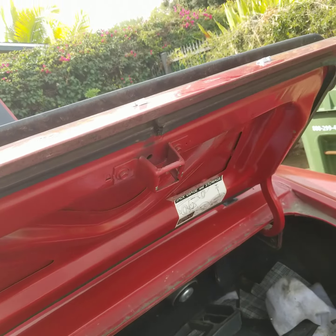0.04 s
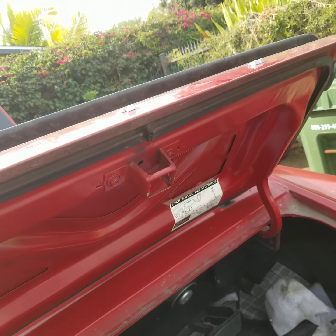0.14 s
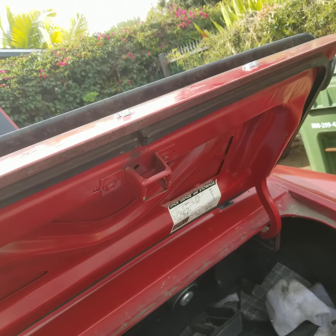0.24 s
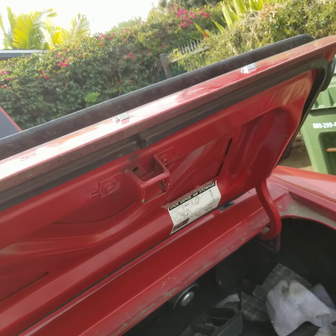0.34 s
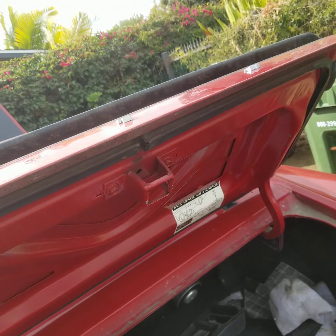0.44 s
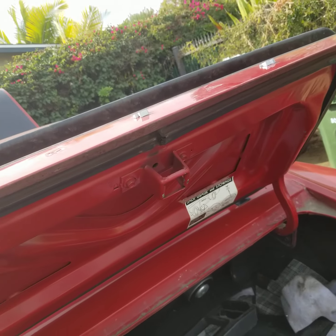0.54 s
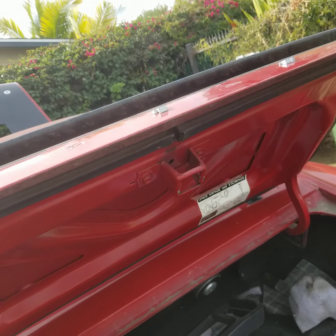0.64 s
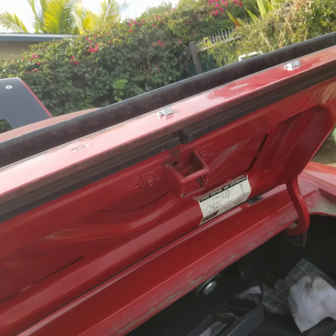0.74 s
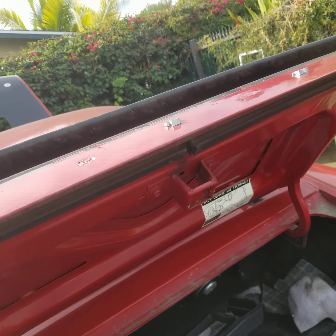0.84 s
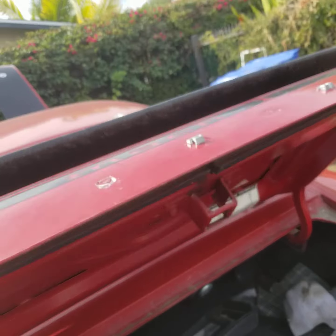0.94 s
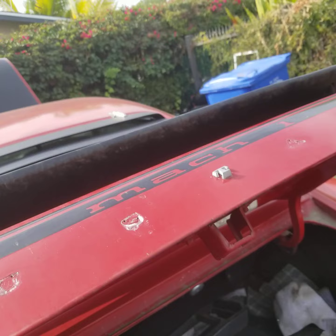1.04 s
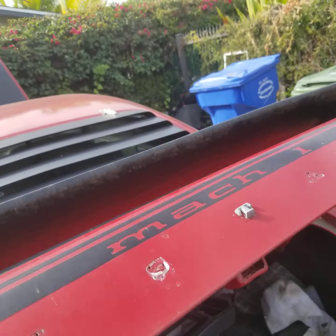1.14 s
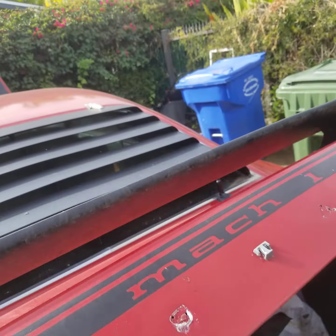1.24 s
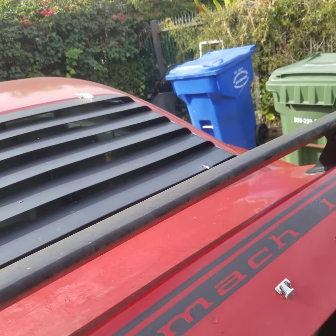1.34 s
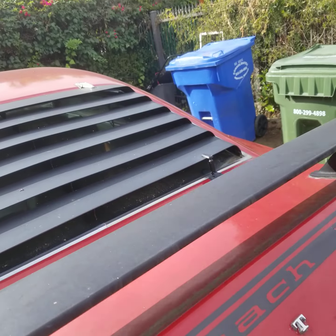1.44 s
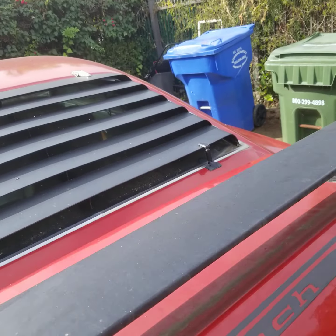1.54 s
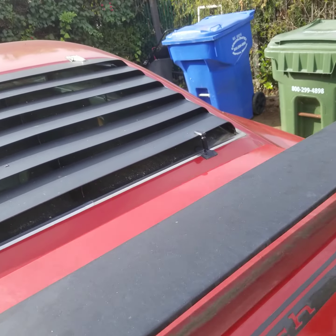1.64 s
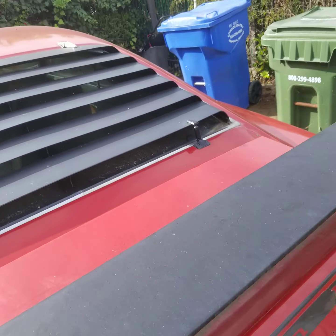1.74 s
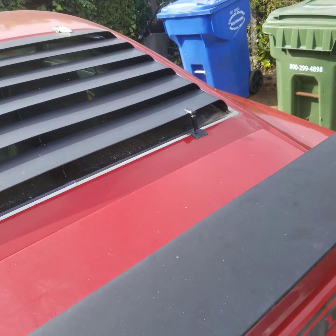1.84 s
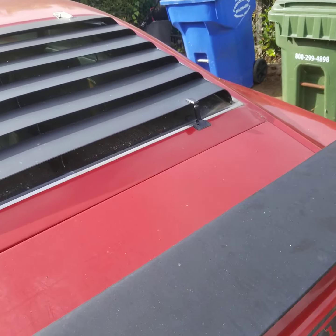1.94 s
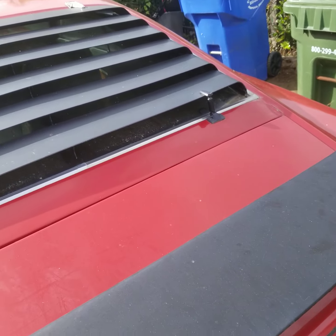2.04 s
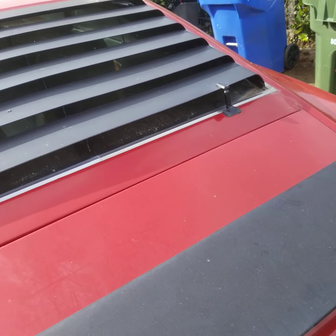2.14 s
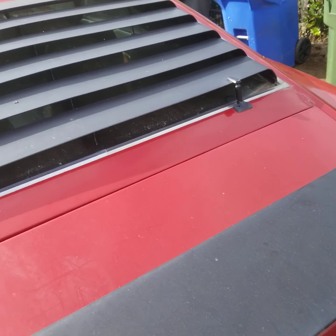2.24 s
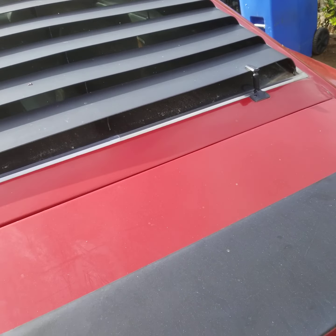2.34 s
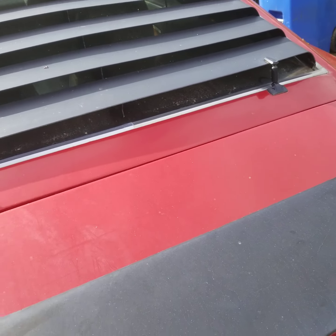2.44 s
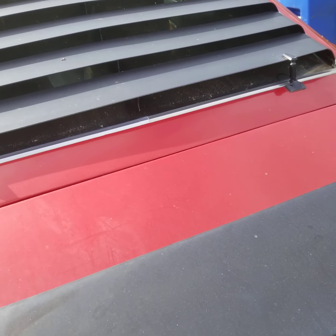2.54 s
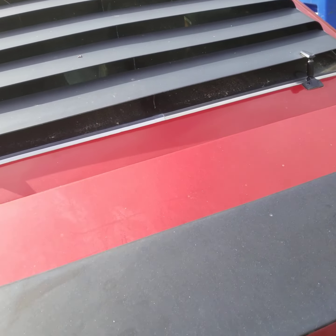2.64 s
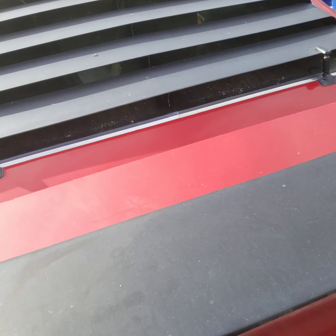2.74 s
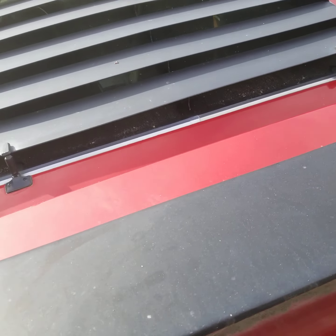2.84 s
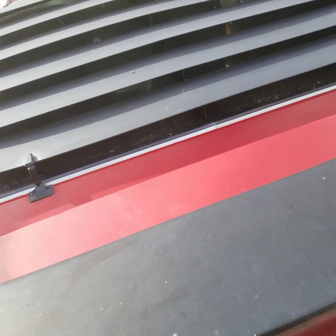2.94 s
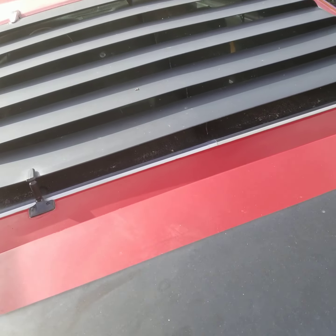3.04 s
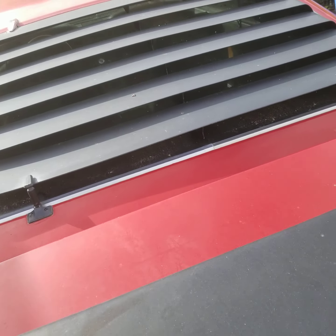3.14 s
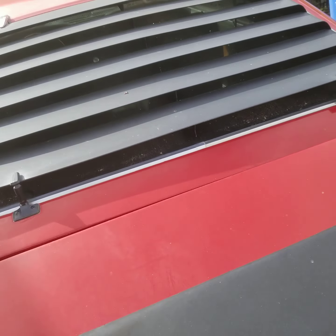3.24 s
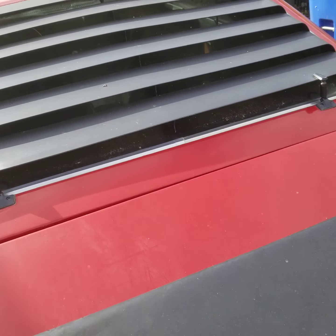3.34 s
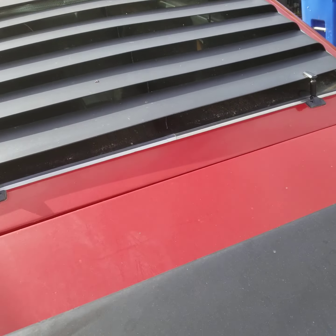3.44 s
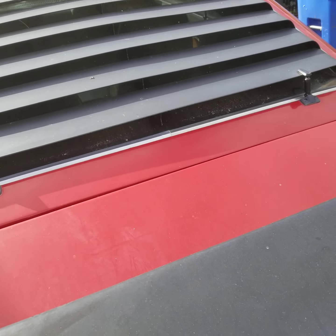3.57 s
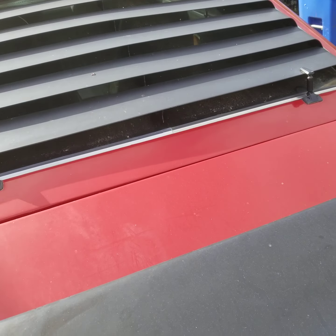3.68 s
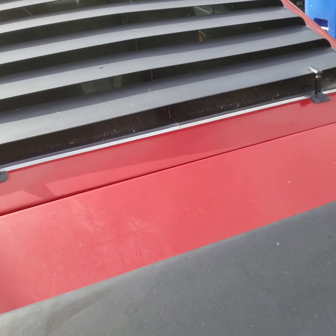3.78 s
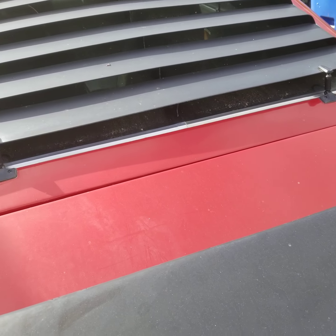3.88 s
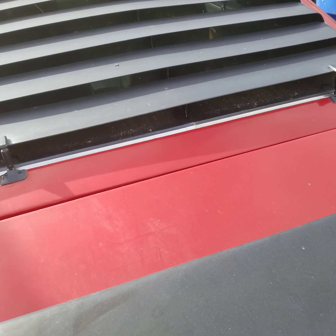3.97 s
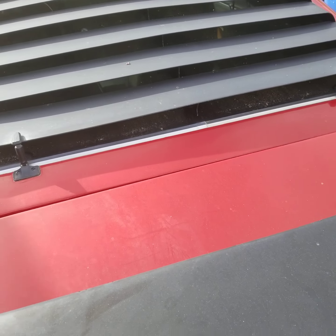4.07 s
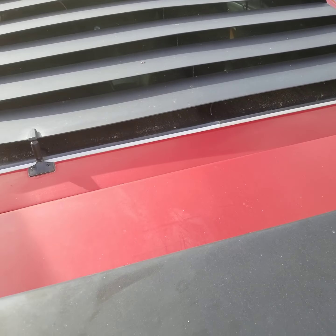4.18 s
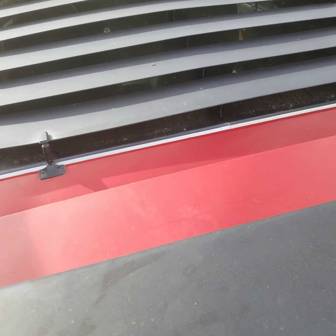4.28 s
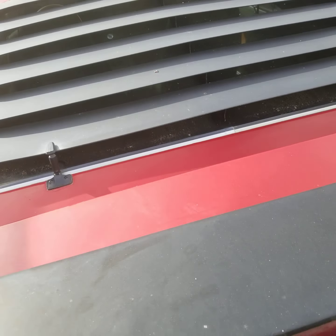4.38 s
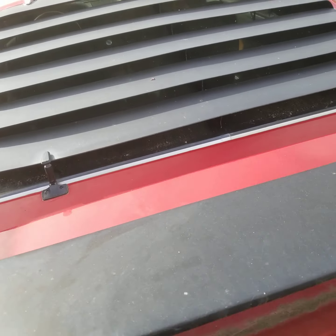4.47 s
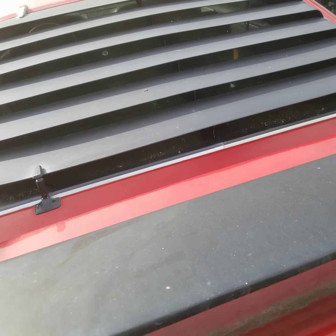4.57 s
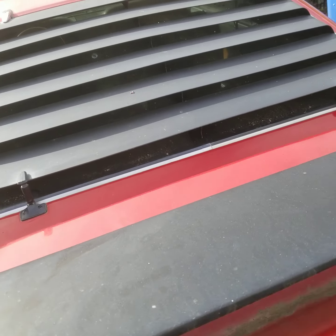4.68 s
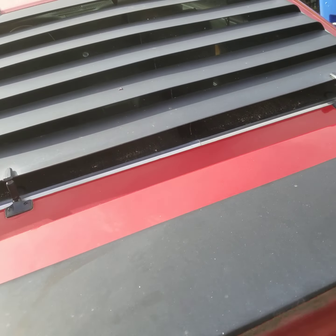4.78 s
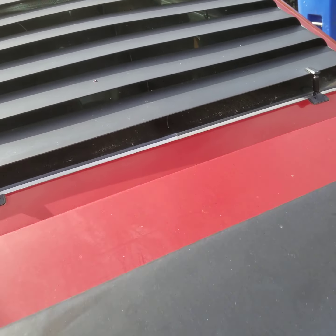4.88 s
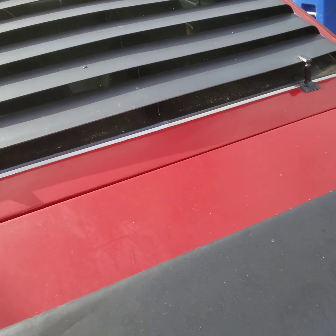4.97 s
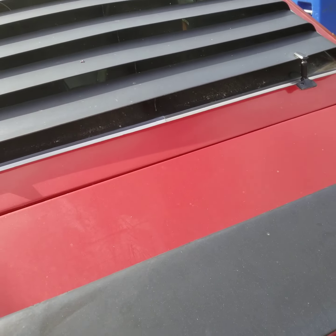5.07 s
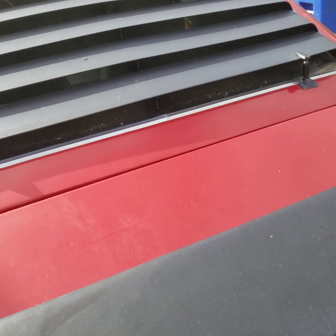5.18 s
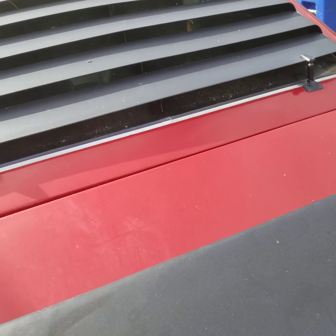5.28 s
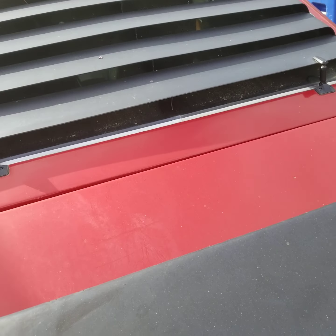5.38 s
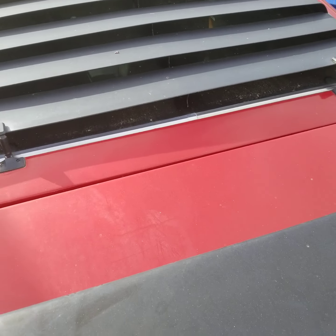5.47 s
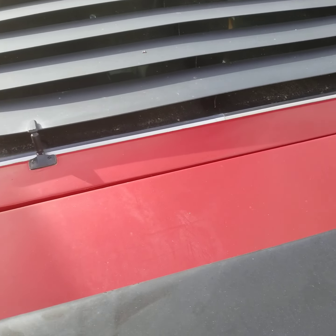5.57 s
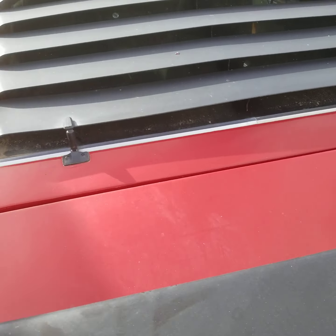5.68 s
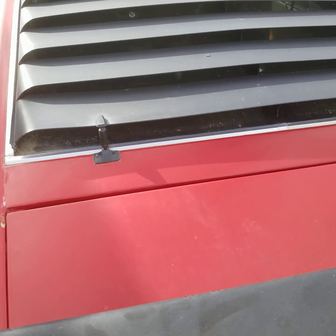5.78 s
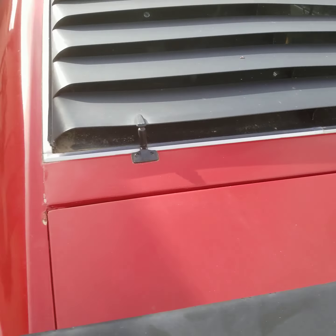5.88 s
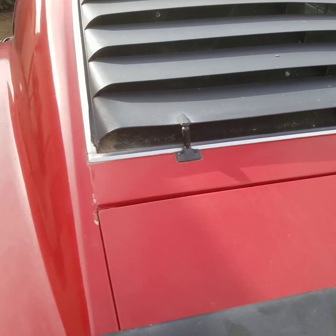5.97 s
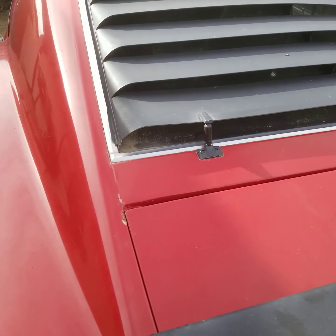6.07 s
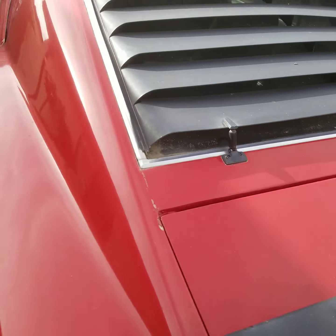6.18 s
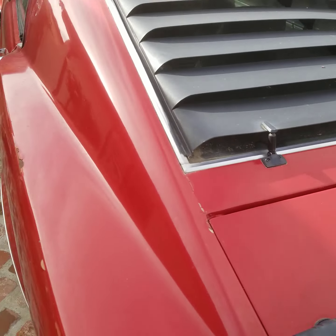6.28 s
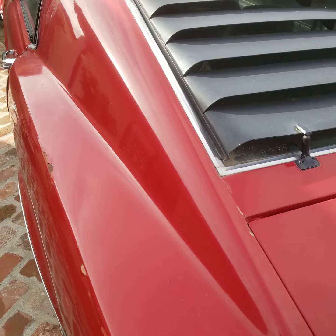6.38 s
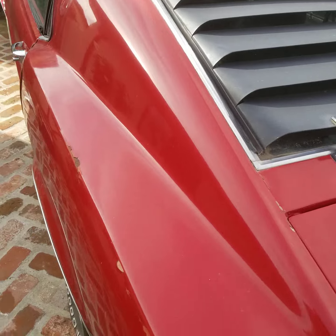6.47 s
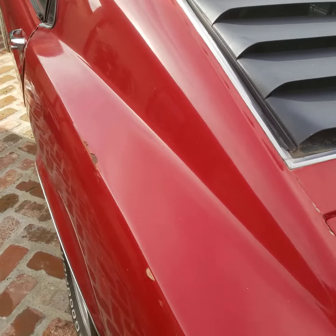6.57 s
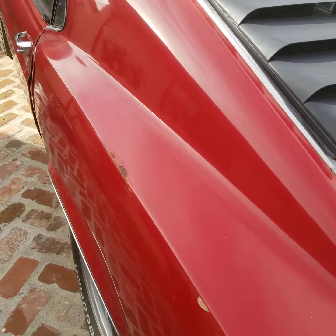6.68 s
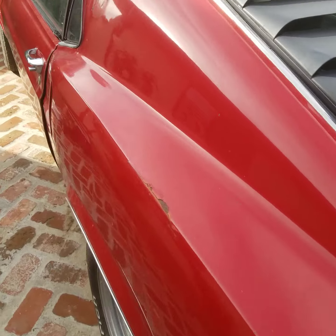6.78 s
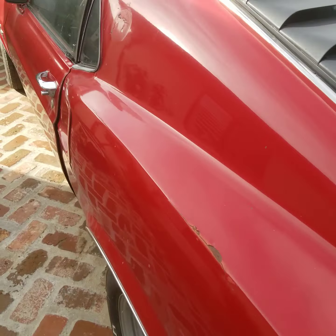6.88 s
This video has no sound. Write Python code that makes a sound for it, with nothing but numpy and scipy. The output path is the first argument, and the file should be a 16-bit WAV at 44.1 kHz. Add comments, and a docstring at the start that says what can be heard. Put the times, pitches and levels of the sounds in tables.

```python
"""In a yard, a steel trunk lid is slammed three times and popped open twice, close to a phone.
The phone hears through two microphone openings, its left and right ports.
Each slam is latch chatter, a push of air from the trunk and a shaking panel; loose trim ticks afterwards.
Street rumble, breeze, far wash, a passing car, a hum and an engine are shaped noise and wavering tones.
The left port lacks bass, hisses and is ducked at sudden sounds; gain control turns loud sounds down."""
import sys
import numpy as np
from scipy import signal
from scipy.fft import rfft, irfft
from scipy.io import wavfile
from scipy.ndimage import uniform_filter1d

SR = 44100
rng = np.random.default_rng(int(sys.argv[2]) if len(sys.argv) > 2 else 0)


def inscribe(sig):
    """Save sig as 16-bit PCM at rate SR to the path in sys.argv[1].

    A 1-D sig is mono; a 2-D sig holds one channel per row.
    Samples are clipped to [-1, 1] before scaling.
    """
    pcm = np.round(np.clip(np.atleast_2d(sig).T, -1, 1) * 32767)
    wavfile.write(sys.argv[1], SR, pcm.astype(np.int16))


N = 305036  # length in samples

# The slams. Each row: latch strikes at, in seconds, level in dB, extra for the first latch bursts in dB,
# extra treble in dB, lid lands this many seconds later, landing in dB relative to the level,
# push of air in dB, extra for the air's bounces in dB.
SLAMS = [(1.91, -4.5, 0, -0.5, .016, -3, 7.5, -4.5), (3.288, -4.5, 1, 3.5, .016, 1.5, 6, -6),
         (4.949, 1, -3.5, 3.5, 0.0065, 0.5, 7.5, 0.5)]
# How alike left and right are. Each row: frequency in Hz, likeness from -1 (opposite) to 1 (same).
LIKENESS = [(60, 0.9), (180, 0.98), (550, 0.81), (1650, -0.29), (4970, -0.22), (15000, 0.43)]


def gain_of(db):
    """Turns decibels into a factor."""
    return 10 ** (np.asarray(db) / 20)


def evened(x):
    """Scales a sound to an average strength (rms) of 1."""
    return x / np.sqrt(np.mean(x ** 2) + 1e-20)


def read(points, hz):
    """Reads a table at each frequency, with straight lines between its points on a log scale."""
    f, value = np.transpose(points)
    return np.interp(np.log(hz + 1), np.log(f + 1), value)


def level(rows, axis=1):
    """Turns one dB column of a table over time into a factor for every sample."""
    rows = np.array(rows)
    return gain_of(np.interp(np.arange(N) / SR, rows[:, 0], rows[:, axis]))


def add(mix, s, sound):
    """Mixes a sound in from second s, cutting off what runs past the end."""
    part = mix[..., round(s * SR):][..., :sound.shape[-1]]
    part += sound[..., :part.shape[-1]]


def around(x, hz, span, order=1):
    """Keeps the frequencies from hz / span to hz * span."""
    edges = np.clip([hz / span, hz * span], 20, SR / 2 - 500)
    return signal.sosfilt(signal.butter(order, edges, "band", fs=SR, output="sos"), x)


def coloured(x, points):
    """Makes each frequency louder or softer by a table of Hz and dB."""
    return irfft(rfft(x) * gain_of(read(points, np.fft.rfftfreq(N, 1 / SR))), N)


def smoothed(x, s):
    """Follows x with a time constant of s seconds, already settled at the start."""
    r = np.exp(-1 / (abs(s) * SR))
    return signal.lfilter([1 - r], [1, -r], x, zi=[r * x[:SR // 20].mean()])[0]


def held(db, db_per_s):
    """Keeps each peak above 0 dB and lets it sink at a steady rate."""
    fall = np.arange(N) * db_per_s / SR
    return np.maximum(np.maximum.accumulate(db + fall) - fall, 0)


def noise(spectrum, patchy_db, size=1024):
    """Builds stereo noise of rms 1 from short random spectra, uneven in drifting patches."""
    hop = size // 4
    frames, hz = N // hop + 5, np.fft.rfftfreq(size, 1 / SR)
    a, b, c, d, patches = rng.standard_normal((frames, len(hz), 5)).T
    patches = uniform_filter1d(patches, size=8, axis=0)  # over frequency
    patches = evened(uniform_filter1d(patches, size=12, axis=1))  # over time
    same = np.clip(read(LIKENESS, hz), -1, 1)[:, None]
    right = a + 1j * b
    left = same * right + np.sqrt(1 - same ** 2) * (c + 1j * d)
    z = np.array([left, right])
    z *= gain_of(read(spectrum, hz)[:, None] + patchy_db * patches)
    return evened(signal.istft(z, nperseg=size, noverlap=size - hop)[1][:, :N])


def ring(modes, phase=0):
    """Adds up one second of dying tones, the ways a body likes to shake, to a total energy of 1."""
    hz, db, t60 = np.transpose(modes)[:, :, None]
    t = np.arange(SR) / SR
    tones = gain_of(db - 60 * t / t60) * np.sin(2 * np.pi * hz * t + phase)
    out = tones.sum(0)
    return out / np.linalg.norm(out)


def lid(direct_db=-1, modes_db=-10, dense_db=-4, contacts_per_s=2200, count=5):
    """Each blow clatters at one of a few panel spots: direct contact, clear tones, crowded tones."""
    # Clear tones of the panel. Each row: frequency in Hz, relative level in dB, seconds to fall by 60 dB.
    panel = [(179.3, -3, 0.25), (236.9, 0, 0.22), (280.2, -3, 0.23), (320, 2.5, 0.098), (372, 1, 0.18),
             (423, -2.5, 0.22), (457.3, -7, 0.17), (569, -5, 0.1), (616, -6.5, 0.2), (710, -12, 0.15),
             (858, -10, 0.24), (935, 3, 0.052), (1065, -15, 0.24), (1260, -17, 0.28), (1740, -7, 0.1),
             (2105, -22, 0.18), (2320, -16, 0.16)]
    # Crowded tones of the panel. Each row: frequency in Hz, seconds to fall by 60 dB.
    crowd_decay = [(100, .32), (400, .23), (1000, .22), (2500, .17), (5000, .1), (12000, .06)]

    force, t = np.zeros((count, N)), np.arange(SR // 2) / SR
    for k, (s, db, hz, dies, edge_db) in enumerate(blows()):
        touching = rng.random(len(t)) < contacts_per_s / SR
        contacts = rng.standard_normal(len(t)) * touching
        contacts[0] = 2.28  # the first touch
        span = 1 + 1.14 * np.sqrt(500 / max(hz, 450))  # narrower for higher colours
        body = evened(around(contacts, hz, span, order=2))
        edge = evened(around(contacts, 3000, span=2))
        add(force[k % count], s, (body + gain_of(edge_db) * edge) * gain_of(db - 60 * t / dies))

    # one second of noise for each spot, each frequency dying at its own rate
    crowd = noise([(100, 11.0), (400, -2.5), (2000, 3), (12000, -4.0)], 0, size=256)
    dense = crowd[:, :count * SR].reshape(2, count, SR)
    hz, frame_s, z = signal.stft(dense, SR, nperseg=256)
    dying = z * gain_of(-60 * frame_s / read(crowd_decay, hz)[:, None])
    dense = signal.istft(dying, SR, nperseg=256)[1][..., :SR]

    widest = np.arccos(read(LIKENESS, np.array(panel)[:, :1]))  # less alike, further apart in phase
    out = np.zeros((2, N))
    for spot in range(count):
        phase = 2 * np.pi * rng.random((len(panel), 1))
        apart = rng.uniform(-1.43, 1, phase.shape) * widest
        answer = gain_of(modes_db) * np.array([ring(panel, phase + apart), ring(panel, phase)])
        answer += gain_of(dense_db) * dense[:, spot] / np.linalg.norm(dense[1, spot])
        # the way round the phone delays each band differently
        turn = np.cumsum(rng.uniform(-1, .2, 129))
        answer[0, :256] += gain_of(direct_db) * irfft(np.exp(1j * (turn - turn[0])))
        answer[1, 0] += gain_of(direct_db)
        out += signal.fftconvolve(force[spot][None], answer, axes=1)[:, :N]
    return out


def blows():
    """Lists every burst of tiny metal contacts in order of time, in the columns of the knocks."""
    # Single knocks and rebounds of the lid. Each row: start in seconds, level in dB, colour (centre) in Hz,
    # seconds to die by 60 dB, bright edge in dB relative to the body.
    knocks = [(0.697, -44, 860, 0.13, -29), (3.173, -32, 260, 0.1, -32), (3.233, -7.5, 258, 0.037, -35),
              (3.233, -29, 1610, .05, -28), (3.244, -34, 380, 0.055, -40), (3.44, -26, 480, 0.26, -37.5),
              (4.507, -32.5, 450, 0.029, -34), (4.561, -33, 328, 0.093, -38), (4.746, -25, 173, 0.038, -42),
              (4.772, -26.5, 150.6, 0.068, -42), (4.833, -46, 172, .06, -43), (5.107, -8, 850, 0.027, -21),
              (5.139, -23, 1040, 0.028, -41), (5.175, -24, 920, 0.12, -25)]
    # The lid is released. Each row: time in seconds, level in dB.
    pops = [(2.594, -24.5), (4.104, -23)]
    # Bursts of one release. Each row: seconds after the pop, relative level in dB, then as in the knocks.
    release = [(-.011, -12, 171, 0.57, -40), (0, 1.5, 1920, 0.063, -53), (0.009, -8, 1800, .05, 5)]
    # The latch in a slam. Each row: seconds after the strike, relative level in dB, then as in the knocks.
    latch = [(0, -8, 1870, 0.13, 3), (.003, -10, 417, 0.16, -40), (.01, -2.5, 1590, 0.021, -2.5),
             (.049, -0.5, 730, 0.13, -5.5), (.068, -7.5, 480, .07, -2.5), (.107, -25.5, 402, .3, 1.5)]
    # The lid edge in a slam. Each row: seconds after landing, relative level in dB, then as in the knocks.
    landing = [(-.004, -6, 470, 0.057, -34), (.009, -2, 205, 0.15, -51), (.018, -3, 670, 0.13, -8),
               (.034, -6, 160, .15, -60), (.075, -11.5, 436, 0.15, -21)]

    rows = list(knocks)
    for s, db in pops:
        for after, step_db, *rest in release:
            rows.append((s + after, db + step_db, *rest))
    for s, db, sharp_db, treble_db, lands, land_db, *_ in SLAMS:
        for after, step_db, hz, dies, edge_db in latch:
            burst_db = db + step_db + sharp_db * (after < .03)
            rows.append((s + after, burst_db, hz, dies, edge_db + treble_db))
        for after, step_db, hz, dies, edge_db in landing:
            burst_db = db + land_db + step_db
            rows.append((s + lands + after, burst_db, hz, dies, edge_db + treble_db))
    return sorted(rows)


def trunk():
    """The lid pulls, then pushes the air's low tones; the ports get nearly the same wave."""
    # Cavity and springs. Each row: frequency in Hz, relative level in dB, seconds to fall by 60 dB.
    low_modes = [(56.97, -15, 1), (61, -12.5, 1), (69.74, -3.5, 0.39), (92.3, 3, 0.086), (98.33, -5, 0.83),
                 (131.3, -10.5, 0.48), (160, -20.5, 0.31)]

    left_phase = rng.uniform(-1.4, 0.71, (len(low_modes), 1))
    boom = np.array([ring(low_modes, left_phase), ring(low_modes)])
    out = np.zeros((2, N))
    for s, db, lasts in thumps():
        push = -np.sin(2 * np.pi * np.arange(0, 1, 1 / (lasts * SR)))
        wave = signal.fftconvolve(push[None], boom, axes=1)
        add(out, s, gain_of(db) * wave / abs(wave[1]).max())
    return out


def thumps():
    """Lists every push of air as start in seconds, peak level in dB and length in seconds."""
    # Air squeezed in the trunk; all but the first are bounces.
    # Each row: seconds after landing, relative level in dB, length of the push in seconds.
    pushes = [(0, 0, 0.011), (0.033, 1.5, 0.013), (0.079, -1, .0065)]

    rows = []
    for s, *_, lands, _, push_db, bounce_db in SLAMS:
        for after, step_db, lasts in pushes:
            rows.append((s + lands + after, push_db + step_db + bounce_db * (after > 0), lasts))
    return rows


def rocking(rock_db=-23.5, t60_s=0.88):
    """The car rocks on its springs: a low uneven rumble that dies slowly after each slam."""
    sway, t = np.zeros(N), np.arange(2 * SR) / SR
    for s, db, *_ in SLAMS:
        rise = np.minimum(t / .1, 1)
        add(sway, s, rise * gain_of(rock_db + db - 60 * t / t60_s))
    return sway * noise([(25, -6), (50, 7), (70, -3), (110, -2), (200, -36)], patchy_db=-0.5, size=2048)


def trim():
    """Hinge and trim give dry ticks: bursts of noise that die within milliseconds."""
    # Each row: start in seconds, level in dB, centre of the colour in Hz.
    ticks = [(.92, -31, 5250), (0.956, -53, 5500), (.988, -48, 5500), (1.353, -35, 2900),
             (1.386, -34, 4040), (1.642, -22, 4130), (1.679, -22.5, 4300), (1.707, -37, 5500),
             (1.717, -28.5, 5160), (1.733, -25.5, 5670), (2.044, -12, 3500), (2.085, -26, 6050),
             (2.174, -38, 4000), (3.178, -38, 2500), (3.513, -34, 2980), (5.051, -15, 7850),
             (5.109, -15.5, 4000), (5.177, -24.5, 6000), (5.601, -30, 1520), (6.192, -30, 8100)]

    out, t = np.zeros((2, N)), np.arange(2000) / SR
    fade = gain_of(-60 * t / .025)  # 60 dB in 25 ms
    for s, db, hz in ticks:
        tick = evened(around(rng.standard_normal((2, len(t))), hz, span=1.6, order=2))
        add(out, s, gain_of(db) * tick * fade)
    return out


def brushing():
    """Seal and sleeve brush along: short swells of fine rubbing noise."""
    # Each row: middle of the swell in seconds, level in dB, half its length in seconds, centre in Hz.
    swishes = [(1.149, -46, 0.07, 13000), (1.307, -42.5, .12, 13000), (1.464, -39.5, 0.087, 2280),
               (2.968, -40, 0.072, 13200), (3.234, -37.5, 0.044, 12680), (4.49, -40, 0.059, 13400),
               (4.777, -43, 0.056, 12300), (6.847, -41, 0.088, 13000)]

    out = np.zeros((2, N))
    for s, db, half_s, hz in swishes:
        rub = evened(around(rng.standard_normal((2, SR // 4)), hz, span=2.96))
        rub = rub[:, :round(2 * half_s * SR)]
        add(out, s - half_s, gain_of(db) * rub * np.hanning(rub.shape[1]))
    return out


def yard():
    """Street rumble, breeze, a far car and far wash are noises; a hum and a far engine are tones."""
    # Each row: time in seconds, street rumble in dB, far wash in dB.
    levels = [(0, -41.5, -66.5), (.7, -31.5, -64.5), (1.2, -36.5, -56), (2.3, -32.5, -51), (3.1, -38, -50),
              (4.1, -31.5, -49.5), (4.5, -36, -46.5), (5.7, -34, -40.5), (6.92, -33.5, -39)]
    # Colours of the four noises. Each row: frequency in Hz, relative strength in dB per Hz.
    rumble_colour = [(60, -25), (110, 0), (200, 1), (330, -8.5), (520, -14), (650, -27), (1000, -35)]
    breeze_colour = [(15, -37), (35, 20), (60, -7.5), (100, 10.5), (150, -41), (300, -43.5)]
    wash_colour = [(300, -22.5), (700, 3), (1200, -1.5), (2000, -5.5), (3500, -23), (6000, -24),
                   (10000, -55), (16000, -42)]
    car_colour = [(90, -14), (130, -8), (200, 19), (280, -0.5), (350, -32.5)]
    breeze_db = -35.5
    car_s, car_db, car_pass_s = 0.49, -31.5, 0.24  # nearest moment, level then, time to half of it
    hum_s, hum_hold_s, hum_db, hum_rest_db = 0.607, .13, -40.5, -54.5  # swells once, on top of its rest
    engine_s, engine_rise_s, engine_db = 6.1, 0.3, -31  # comes up and stays

    t = np.arange(N) / SR
    rumble = level(levels, axis=1) * noise(rumble_colour, patchy_db=3.0, size=2048)
    breeze = gain_of(breeze_db) * noise(breeze_colour, patchy_db=2.5, size=2048)
    wash = level(levels, axis=2) * noise(wash_colour, patchy_db=-0.74)
    passing = gain_of(car_db) / np.sqrt(1 + 3 * ((t - car_s) / car_pass_s) ** 2)
    car = passing * noise(car_colour, patchy_db=3.5, size=2048)
    swell = 1. * (t > hum_s) * (t < hum_s + hum_hold_s)
    swell = uniform_filter1d(swell, size=2600)  # soft start and end
    hum = (gain_of(hum_rest_db) + gain_of(hum_db) * swell) * drone(497, 5.15)
    rise = np.clip((t - engine_s) / engine_rise_s, 0, 1)
    engine = gain_of(engine_db) * rise * drone(73, 3.8)
    return rumble + breeze + car + wash + hum + engine


def drone(hz, waver_hz):
    """A pure tone of rms 1 whose pitch wanders at random by about waver_hz."""
    wander = evened(smoothed(smoothed(rng.standard_normal(N), 0.036), 0.031))
    return np.sqrt(2) * np.sin(2 * np.pi * np.cumsum(hz + waver_hz * wander) / SR)


def fizz(fizz_db=-60):
    """A faint high noise of both ports."""
    # Each row: frequency in Hz, relative strength in dB per Hz.
    fizz_colour = [(5000, -30), (8000, -16), (11000, -29), (14000, -16), (16000, -5)]
    return gain_of(fizz_db) * noise(fizz_colour, patchy_db=-1.0)


def scene():
    """Adds up everything that reaches the two ports, and their fizz."""
    return lid() + trunk() + rocking() + trim() + brushing() + yard() + fizz()


def ducked(left, right):
    """Band by band, the left port is turned down while the right one swells suddenly."""
    # Bands from low to high. Each row: upper edge in Hz, recovery in dB per second.
    bands = [(700, 600), (2600, 700), (9000, 1500)]

    out, below = left.copy(), np.zeros((2, N))
    for edge_hz, db_per_s in bands:
        upto = coloured(np.array([left, right]), [(edge_hz, 0), (1.4 * edge_hz, -60)])
        mine, other = upto - below
        power = other ** 2 + 1e-12
        rise_db = 10 * np.log10(smoothed(power, .004) / smoothed(power, .08))  # quick against slow average
        cut = gain_of(-held(4.5 * (rise_db - 7), db_per_s))
        out -= mine * (1 - np.roll(cut, -SR // 400))  # looks a few milliseconds ahead
        below = upto
    return out


def record(dry, hiss_db=-43.5, top_hz=15900):
    """The phone: port colour, left hiss and ducking, gain control, overload, upper limit."""
    # Colour of both ports, then the left one's own. Each row: frequency in Hz, gain in dB.
    both_ports = [(20, -65.5), (35, -12.5), (60, -3.5), (2000, -5), (4000, -15.5), (5000, -17.5),
                  (6300, -26.5), (8300, -44), (10000, -27), (12500, -16.5), (16000, -16)]
    left_port = [(60, -15), (120, -11.5), (200, -14.5), (380, 3), (1300, 0), (4400, 3), (8000, 5.5),
                 (15000, 3)]
    # Hiss of the left port. Each row: frequency in Hz, relative strength in dB per Hz.
    hiss_colour = [(1200, -25.5), (1700, -12.5), (2400, -11.5), (2800, 0.5), (3500, -5), (4200, -17),
                   (5000, -28.5), (7000, -48)]

    left, right = coloured(dry, both_ports)
    left = coloured(left, left_port) + gain_of(hiss_db) * noise(hiss_colour, patchy_db=-0.06)[0]
    left = ducked(left, right)
    loud_db = 10 * np.log10(smoothed(right ** 2, 0.074) + 1e-12)
    over_db = held(loud_db + 13.5, db_per_s=0.16)  # gain returns less than a decibel a second
    tamed = np.array([left, right]) / gain_of(over_db)
    limited = tamed / (1 + tamed ** 8) ** .125  # peaks are squashed below 1
    lowpass = signal.firwin(511, top_hz, window=("kaiser", 9), fs=SR)
    return signal.oaconvolve(limited, lowpass[None], "same")


dry = scene()
out = record(dry)
inscribe(out)
```